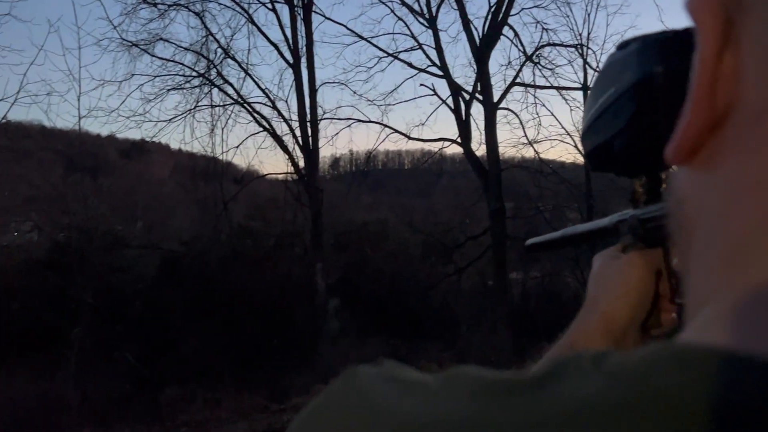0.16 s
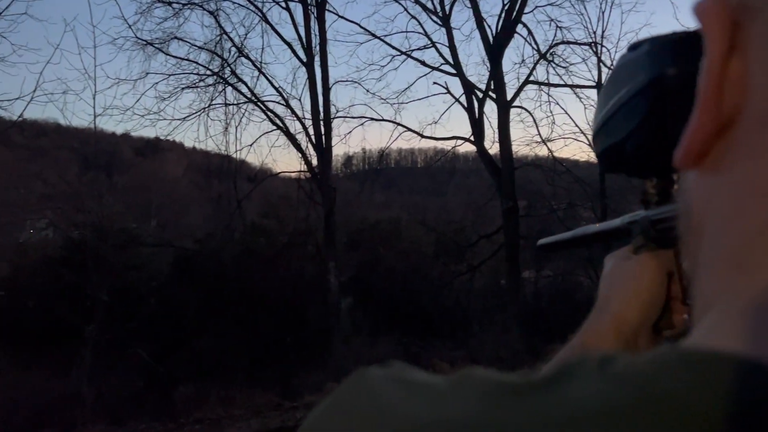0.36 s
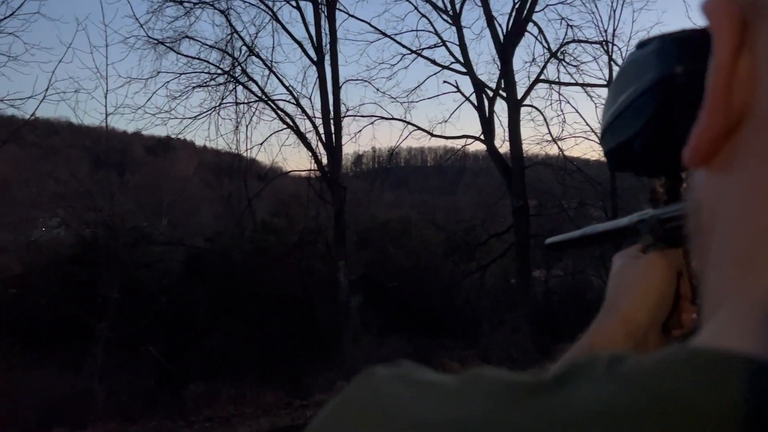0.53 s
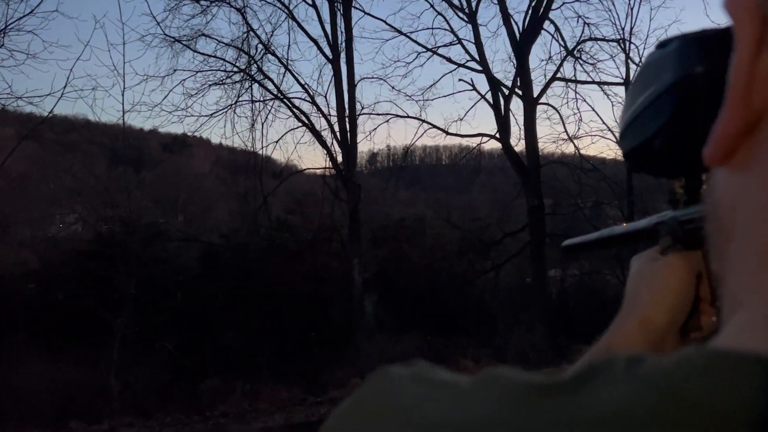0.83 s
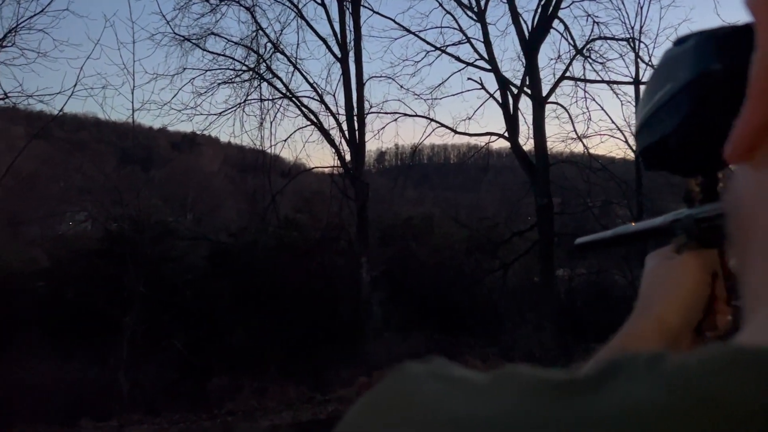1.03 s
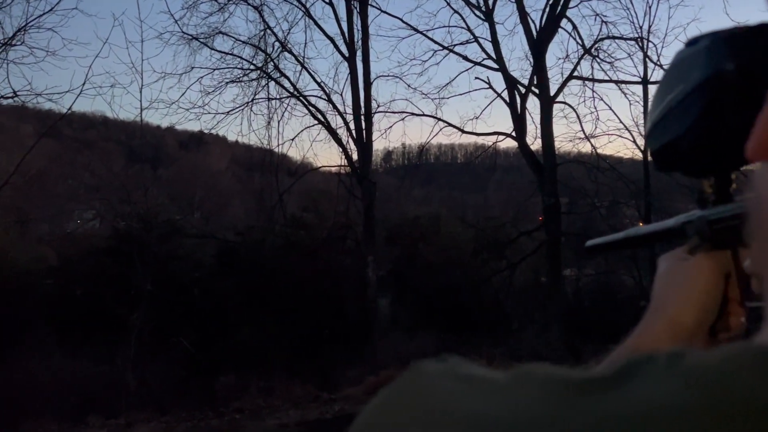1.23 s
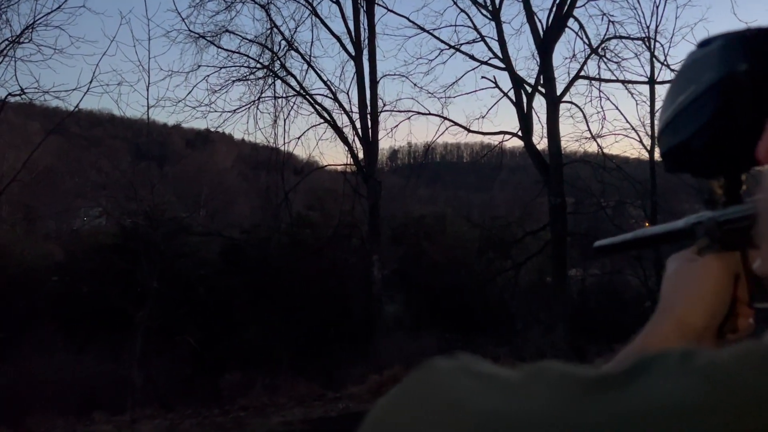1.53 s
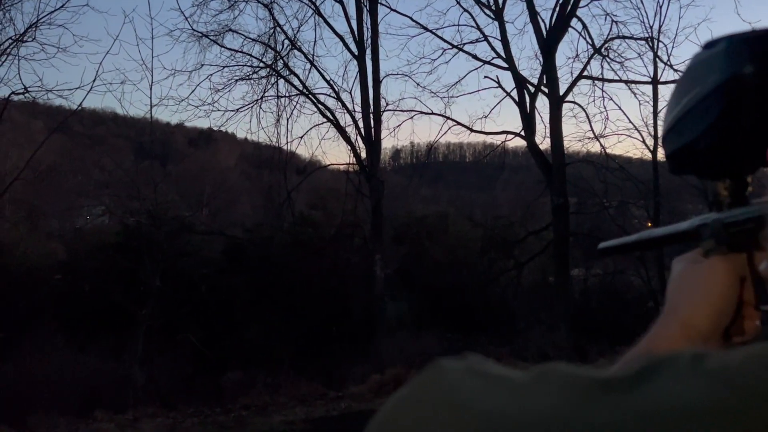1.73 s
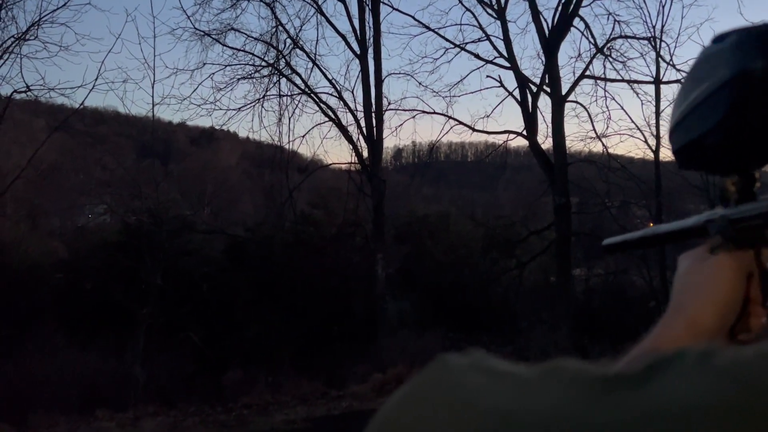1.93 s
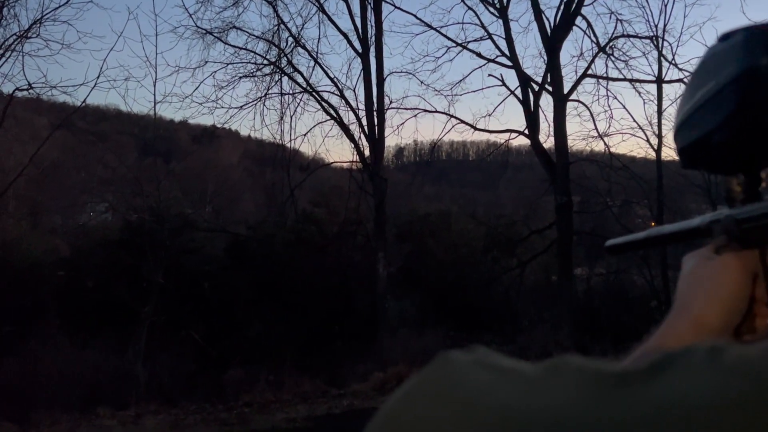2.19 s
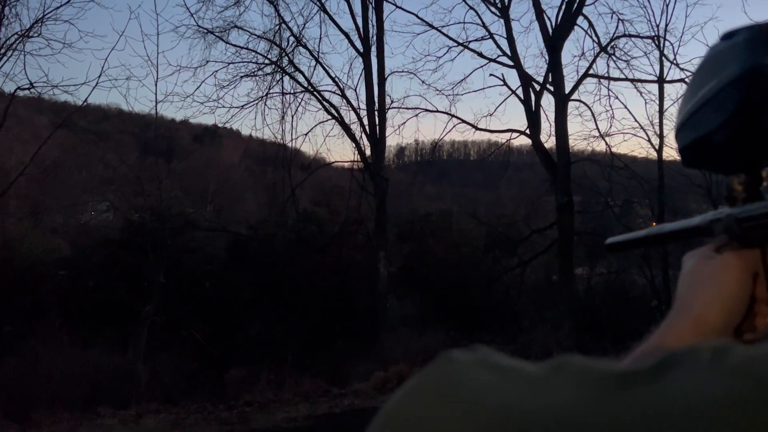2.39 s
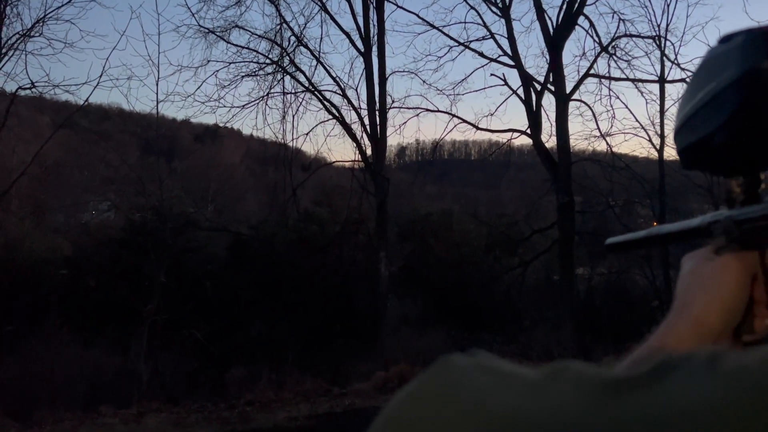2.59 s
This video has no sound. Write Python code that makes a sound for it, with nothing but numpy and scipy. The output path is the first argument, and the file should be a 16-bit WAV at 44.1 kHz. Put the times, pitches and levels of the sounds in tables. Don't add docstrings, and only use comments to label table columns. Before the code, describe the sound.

Rapid paintball gun pops, each with a metallic tick, short gas hiss and low thump, run steadily for about a second, then slow to separate pulls; clicks and feeder rattle fill the gaps, outdoors, heard very near.

```python
import sys
import numpy as np
from scipy import signal
from scipy.fft import rfft, irfft
from scipy.io import wavfile
from scipy.ndimage import uniform_filter1d

SR = 44100
rng = np.random.default_rng(int(sys.argv[2]) if len(sys.argv) > 2 else 0)


def dump_mix(stems):
    frames = np.atleast_2d(stems).T
    limited = np.clip(frames, -1, 1)
    pcm = np.round(limited * 32767).astype(np.int16)
    wavfile.write(sys.argv[1], SR, pcm)


def boost_factor(decibels):
    exponent = np.asarray(decibels, float) / 20
    return 10 ** exponent


N = 121275

# frequency in Hz, density in dB per Hz.
SLIDING_COLOUR = [(150, -27), (600, 1), (1200, -2.5), (2800, -7.5), (4500, -9.5), (7000, -11), (10000, -12),
                  (16000, -17)]


def ring(t, hz, t60):
    t = np.maximum(t, 0)
    return np.sin(2 * np.pi * hz * t / 1000) * np.exp(-np.log(1000) * t / t60)


def puff(t, rise, fall):
    t = np.maximum(t, 0)
    return (1 - np.exp(-(t / rise) ** 2)) * np.exp(-np.maximum(t - rise, 0) / fall)


def puffs(t, rows, c, more_db=0):
    return sum(boost_factor(db + k + more_db) * puff(t - start, rise, fall)
               for (start, rise, fall, db), k in zip(rows, c))


def curve(table):
    hz, value = np.array(table, float).T
    return np.interp(np.log(np.arange(N // 2 + 1) * SR / N + 1), np.log(hz), value)


def noise(table, more_db=0):
    spec = rfft(rng.standard_normal(N)) * boost_factor(curve(table))
    return irfft(spec * boost_factor(more_db), N) / irfft(spec, N).std()


def walk(rate):
    k = int(SR / rate)
    w = uniform_filter1d(uniform_filter1d(rng.standard_normal(N), k), k)
    return w / w.std()


def play(rows, shape, before, after):
    out = np.zeros(N)
    chance = rng.standard_normal((len(rows), 16))
    for row, c in zip(rows, chance):
        first = max(int((row[0] - before) * SR), 0)
        i = np.arange(first, min(int((row[0] + after) * SR), N))
        out[i] += shape((i / SR - row[0]) * 1000, row, c)
    return out


def tree_echo():
    # frequency in Hz, density in dB per Hz.
    wood_colour = [(30, -43), (110, -19), (180, -14), (350, -1.5), (900, -4.5), (1600, -12.5),
                   (3500, -25.5), (16000, -41)]
    # frequency in Hz, level of the unshared part in dB.
    diffuse = [(60, -12), (200, -17.5), (700, -8), (2400, -24), (8000, -11), (15000, -10)]
    wash = noise(wood_colour) * boost_factor(-2 + 1.93 * walk(38))
    return wash, noise(wood_colour, curve(diffuse) + 3)


def feeder_rattle():
    # shell mode in Hz, level in dB, t60 in ms.
    shell_modes = [(364, -4.5, 78), (496, 0.5, 115), (559, 0, 59), (690, -22, 18), (904, -5, 63),
                   (993, -7.5, 50), (1200, -20, 16)]
    knocks_per_s, level_db = 180, -3.5
    t = np.arange(4000) / SR * 1000
    knock_db = np.minimum(3.3 * rng.exponential(size=N), 9)
    hits = (rng.random(N) < knocks_per_s / SR) * boost_factor(knock_db) * boost_factor(2.7 * walk(22))
    rattle = 0
    for hz, db, t60 in shell_modes:
        knocks = hits * rng.standard_normal(N)
        rattle = rattle + boost_factor(db) * signal.fftconvolve(knocks, ring(t, hz, t60))[:N]
    return boost_factor(level_db) * rattle / rattle.std()


def gaps():
    # time in seconds, echo and feeder level in dB.
    effort = [(0.0, -28), (0.2, -32), (0.57, -31.5), (1.34, -36), (1.62, -34), (2.07, -32), (2.35, -34),
              (2.75, -33)]
    busy = boost_factor(np.interp(np.arange(N) / SR, *np.array(effort).T))
    wash, unshared = tree_echo()
    return busy * (feeder_rattle() + wash), busy * unshared


def feeder_drops():
    # start in seconds, peak in dB.
    drop_rows = [(0.133, -16), (0.944, -39), (1.157, -19), (1.298, -31), (1.309, -24), (1.411, -20),
                 (1.437, -23), (1.498, -21), (1.705, -14), (1.838, -29), (1.986, -17), (2.009, -18),
                 (2.091, -12), (2.212, -25)]
    drops = play(drop_rows, lambda t, r, c: boost_factor(min(r[1], -21) - 2) * puff(t, 1.0, 3.3), .002, .05)
    return drops * noise([(200, -41), (500, 9.5), (1300, -4), (3000, -11.5), (9000, -37)])


def trigger():
    # start in seconds, peak in dB, pitch in Hz.
    pulls = [(0.9584, -12, 3740), (1.0882, -17, 4400), (1.1772, -16, 3130), (1.276, -11, 3360),
             (1.492, -22, 3120), (1.6322, -12, 3520), (1.8519, -15.5, 3820), (2.0303, -14.5, 4020),
             (2.2049, -14, 3540), (2.3989, -14.5, 4100), (2.5633, -12, 4000)]

    def click(t, row, c):
        def strike(u):
            modes = zip((1, .6, .78, 1.16), (2.5, -6, -5, -5), c[1:])
            return sum(boost_factor(db + k) * ring(u, row[2] * ratio, 5.5) for ratio, db, k in modes)
        bounce = boost_factor(-3.5) * strike(t - 1.8 - 0.34 * c[0])
        return boost_factor(row[1] - 8.5) * (strike(t - .5) + bounce)

    scrape = play(pulls, lambda t, r, c: boost_factor(r[1] - 19.5) * puff(t, 0.3, 12.0), .002, .04)
    return play(pulls, click, .001, .04) + scrape * noise(SLIDING_COLOUR)


def solenoid(t, row, c):
    # start in ms, mode in Hz, level in dB, t60 in ms.
    tick_modes = [(0, 2760, -11, 8.9), (0.9, 3140, -20.5, 5.6), (-2.5, 5300, -37, 4.3),
                  (2.5, 400, -25.5, 90), (2, 215, -26.5, 330), (7, 2800, -19.5, 5.6), (9.5, 383, -23, 30)]
    t = t + row[2]
    return sum(boost_factor(db + 0.49 * k) * ring(t - start, hz * (1 + 0.0052 * k), t60)
               for (start, hz, db, t60), k in zip(tick_modes, c))


def muzzle_thump(t):
    def pulse(u):
        return -np.sin(2 * np.pi * 105 * u / 1000) * np.exp(-(u / 6.0) ** 2)
    thump_ms, slap_ms, slap_db = 14.6, 30.15, -14
    return boost_factor(-16.8) * (pulse(t - thump_ms) + boost_factor(slap_db) * pulse(t - thump_ms - slap_ms))


def barrel(t, row, c):
    # start in ms, mode in Hz, level in dB, t60 in ms.
    blast_modes = [(4.5, 500, -25.5, 92), (5, 597, -19, 49), (5.5, 865, -26.5, 27), (4, 970, -22, 66),
                   (-0.5, 2060, -19.5, 13), (5.5, 1620, -32, 75), (5, 3200, -25.5, 22), (17, 41, -16, 95),
                   (9, 2670, -46, 46), (4, 1110, -25.5, 34), (19.5, 377, -31, 130)]
    barrel_hz, glide_hz_per_ms, glide_end_ms = 285, 200, 5.5
    exit_ms, swell_ms, choke_ms = 12.6, 5.17, 0.91
    ring_db, ring_t60_ms = -15, 100
    since_exit = t - exit_ms
    after = np.maximum(since_exit, 0)

    glide = glide_hz_per_ms / 2000 * np.maximum(glide_end_ms - t, 0) ** 2
    turns = barrel_hz * since_exit / 1000 - glide
    overtone = boost_factor(-13.5) * np.cos(2 * 2 * np.pi * turns) * np.exp(-np.maximum(since_exit + 2, 0) ** 2)
    wave = np.cos(2 * np.pi * turns) - overtone

    swell = np.tanh(np.maximum(t, 0) / swell_ms) ** 2.07
    choke = (1 - boost_factor(ring_db)) * np.exp(-(after / choke_ms / 2) ** 2)
    tail = boost_factor(ring_db) * np.exp(-np.log(1000) * after / ring_t60_ms)
    env = np.where(t < exit_ms, swell, choke + tail)

    pop = boost_factor(-13.5) * np.exp(-(since_exit / 2.96) ** 2) * np.cos(2 * np.pi * 416 * since_exit / 1000)
    modes = sum(boost_factor(db + 2.3 * k) * ring(t - start, hz, t60)
                for (start, hz, db, t60), k in zip(blast_modes, c))
    return boost_factor(row[1]) * (boost_factor(-3.5) * env * wave + pop + modes) + boost_factor(row[1] / 2) * muzzle_thump(t)


def marker():
    # valve opening in seconds, strength in dB, solenoid lead in ms.
    shots = [(-.0095, 0, 20.6), (.089, -1.2, 20.6), (.1874, 0, 20.7), (.2855, -1.4, 20.5),
             (.3835, -.5, 20.2), (.4816, -.3, 20), (.5801, -1, 20.3), (.6783, -2.5, 20.7),
             (.7958, -1.3, 20.5), (.8944, -2.3, 20.8), (1.0075, -3.6, 20.6), (1.2119, -1.7, 20.5),
             (1.3632, -3.5, 20.2), (1.5681, -1, 20), (1.7489, -1.2, 19.7), (1.9131, -1.8, 19.8),
             (2.117, -1.4, 20.2), (2.2756, -.9, 20.1), (2.46, -1.3, 19.9), (2.6348, -1.3, 20.1),
             (2.7333, -1.2, 20.4)]
    # start in ms, rise in ms, fall in ms, level in dB.
    gas_bursts = [(1, 0.17, 1.02, -12.5), (1.52, 0.35, 1, -15), (4, 0.49, 0.73, -7), (5, 1.3, 1.77, -15),
                  (10, 1.7, 0.7, -35), (4.5, 0.94, 8.5, -29.5), (6, 2.4, 31, -38.5)]
    # start in ms, rise in ms, fall in ms, level in dB.
    bolt_slides = [(-5, 1.0, 1, -58), (2, 0.15, 1.8, -26), (5.5, 1.4, 2.2, -23.5), (9.5, 1.2, 8.5, -37.5),
                   (23.5, 2.8, 13, -24.5)]
    # frequency in Hz, density in dB per Hz.
    gas_colour = [(150, -19), (800, -5), (2200, -2.5), (4200, -9), (7000, -1), (8500, 1.5), (12000, 1),
                  (16000, -12.5)]
    gas = play(shots, lambda t, r, c: puffs(t, gas_bursts, c, r[1] / 2), .002, 0.23)
    bolt = play(shots, lambda t, r, c: puffs(t + r[2], bolt_slides, c), .025, .06)
    tones = play(shots, barrel, .002, .2) + play(shots, solenoid, .022, .06)
    shared = tones + gas * noise(gas_colour) + bolt * noise(SLIDING_COLOUR)
    return shared, boost_factor(-15) * (gas + bolt) * noise(SLIDING_COLOUR)


def scene():
    # frequency in Hz, left port's lead in radians.
    port_phase = [(700, -.17), (3270, .55), (8900, .5), (9700, -2.8), (10700, -3.5), (13500, -9.1),
                  (14200, -9.8), (15300, -12.4)]
    # frequency in Hz, left minus right in dB.
    port_db = [(60, 0.5), (200, -3), (300, -2.5), (650, -3.5), (1300, -1.5), (2400, 0), (4400, 2.5),
               (9000, 0.5)]
    background, unshared = gaps()
    shots, scattered = marker()
    half = boost_factor(curve(port_db) / 2) * np.exp(.5j * curve(port_phase))
    spec = rfft(shots + trigger() + feeder_drops() + background)
    own = unshared + scattered
    return np.array([irfft(spec * half, N) + own, irfft(spec / half, N) - own])


def roll_off(x):
    return signal.sosfilt(signal.butter(12, 17010, fs=SR, output="sos"), x)


def record(dry):
    x = np.tanh(dry * .95) / .95
    bass_cut = signal.butter(3, 43, "high", fs=SR, output="sos")
    x = signal.sosfiltfilt(bass_cut, x, padtype="even")
    top_cut = signal.ellip(6, .2, 50, 16250, fs=SR, output="sos")
    x = signal.sosfiltfilt(top_cut, x)
    return roll_off(x)


dry = scene()
out = record(dry)
dump_mix(out)
```